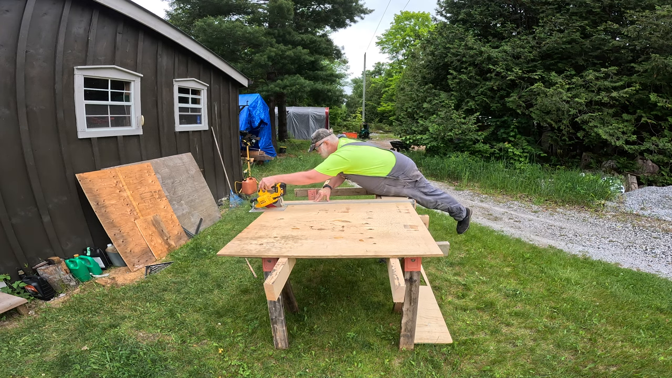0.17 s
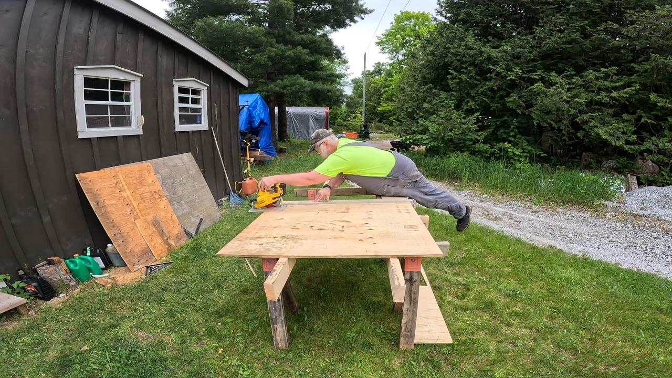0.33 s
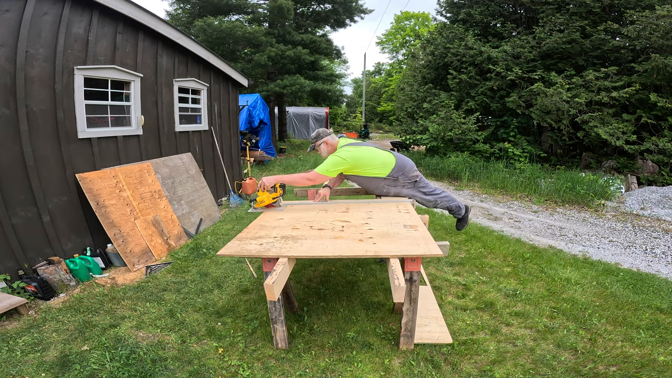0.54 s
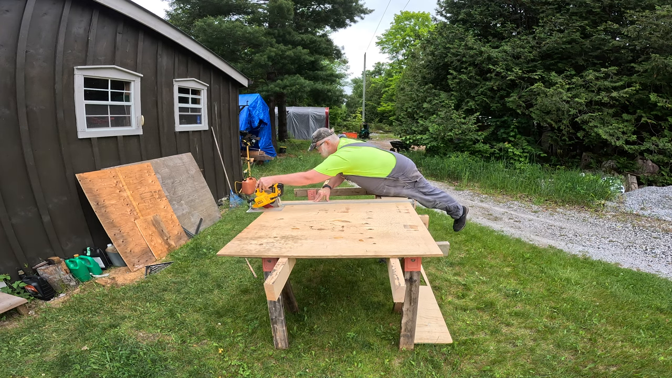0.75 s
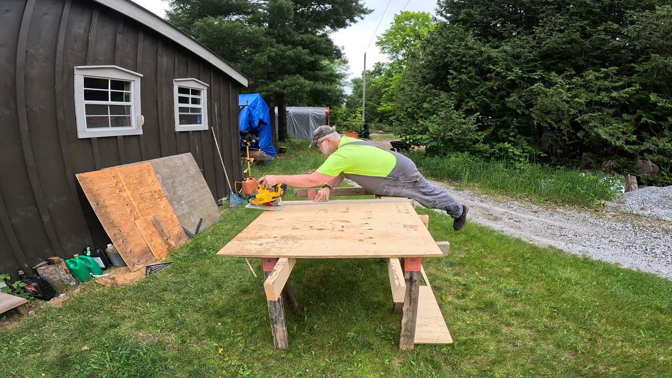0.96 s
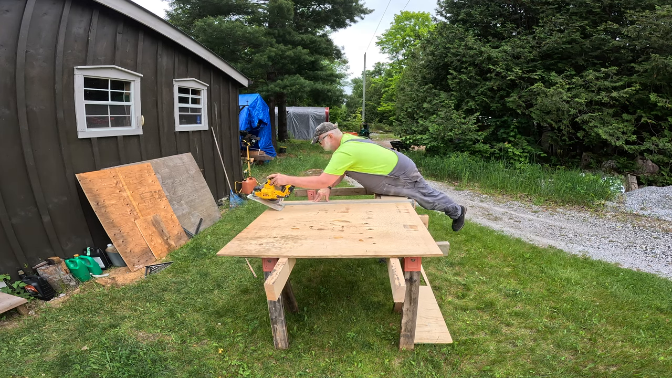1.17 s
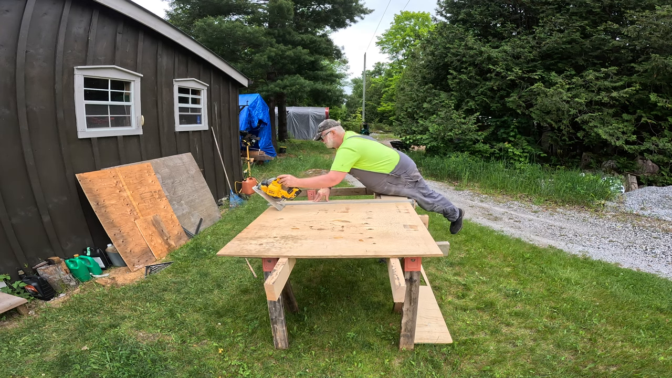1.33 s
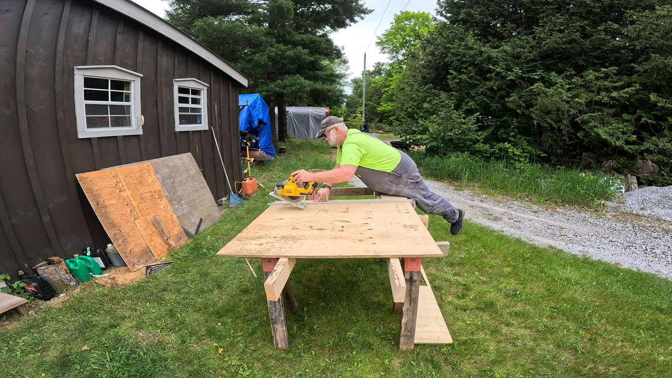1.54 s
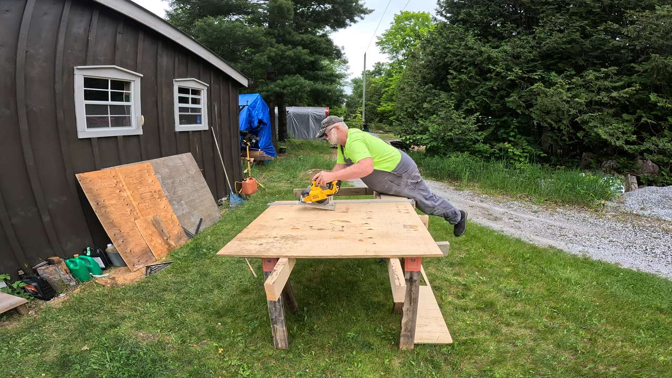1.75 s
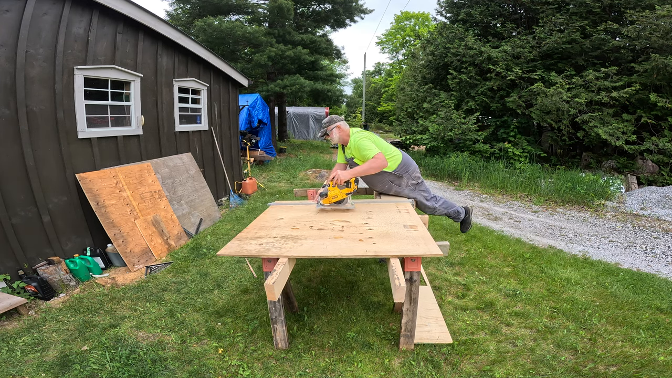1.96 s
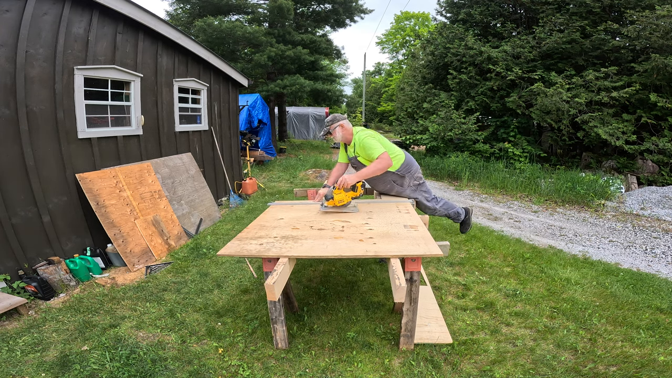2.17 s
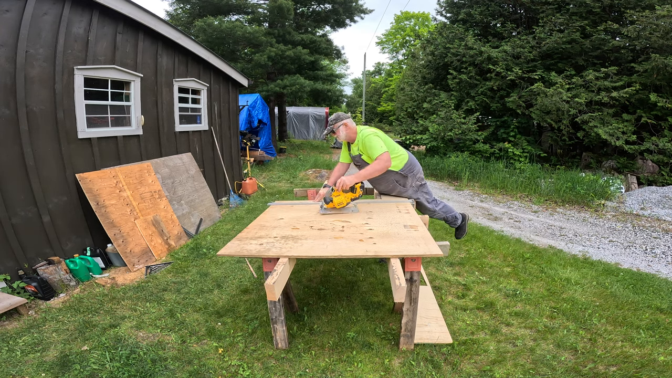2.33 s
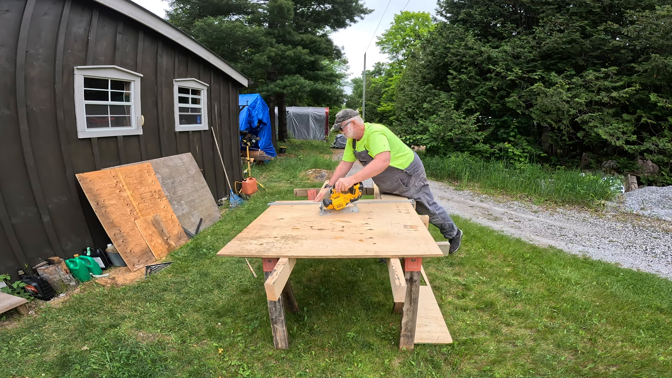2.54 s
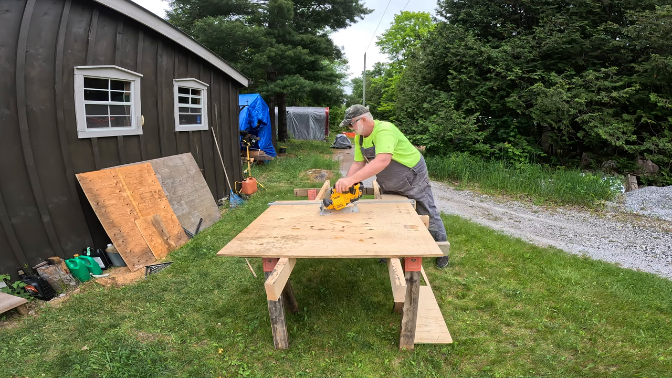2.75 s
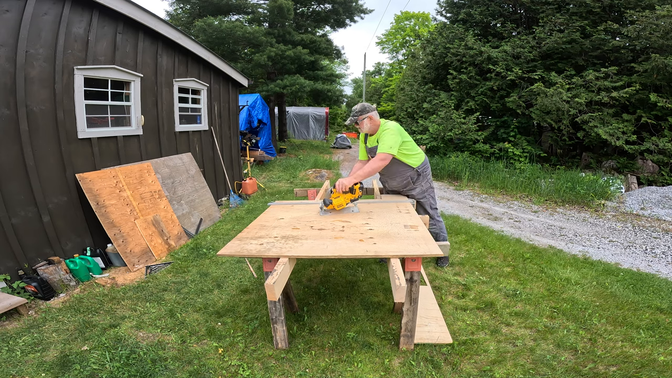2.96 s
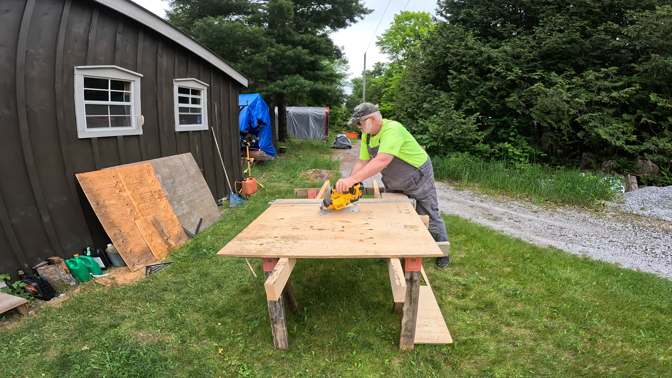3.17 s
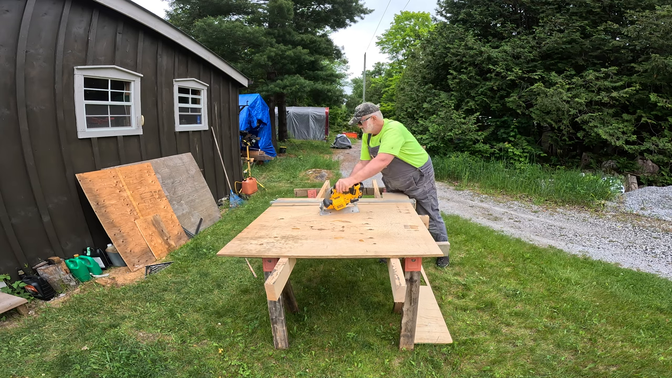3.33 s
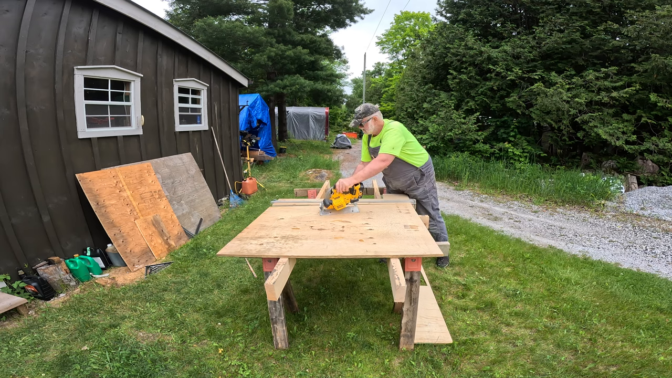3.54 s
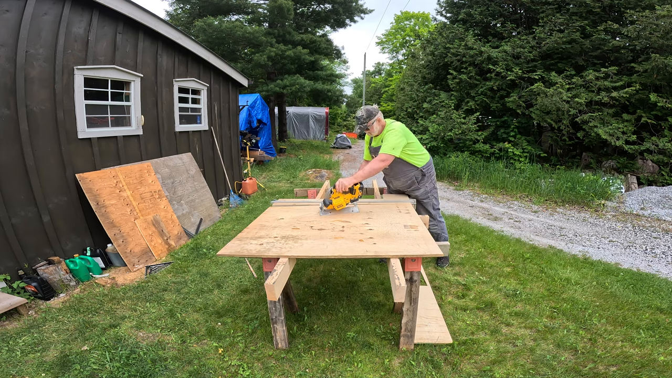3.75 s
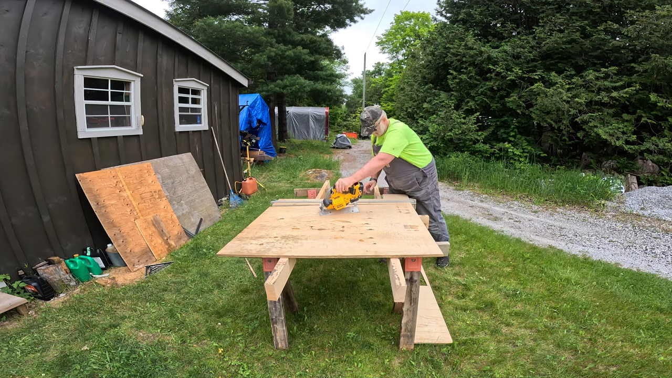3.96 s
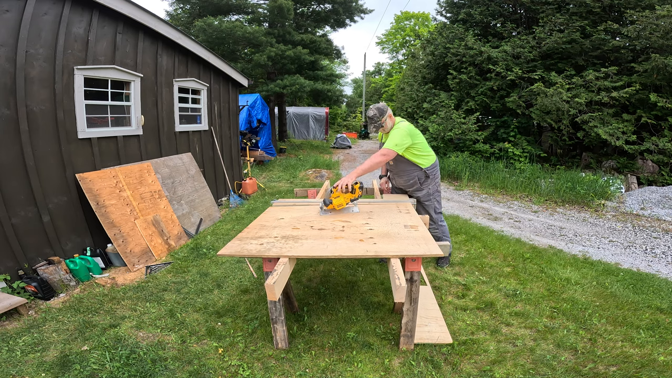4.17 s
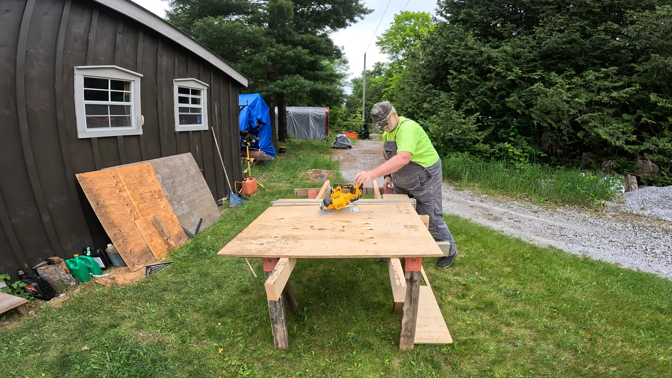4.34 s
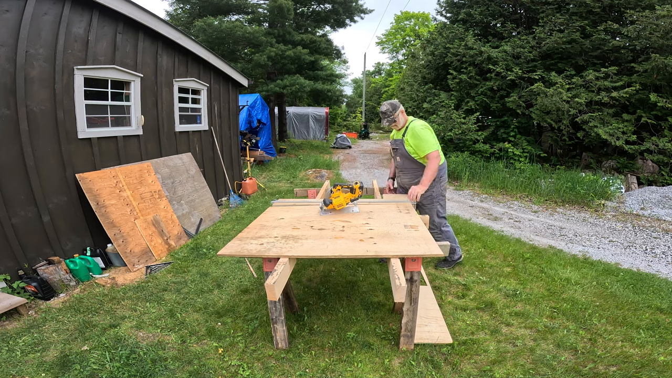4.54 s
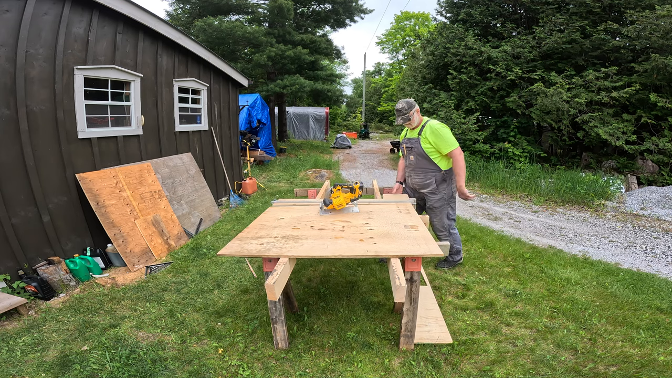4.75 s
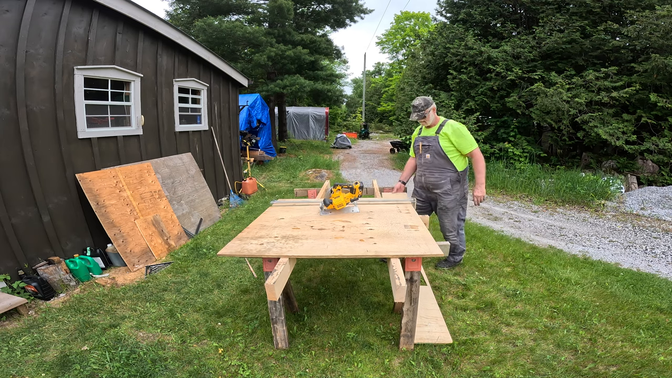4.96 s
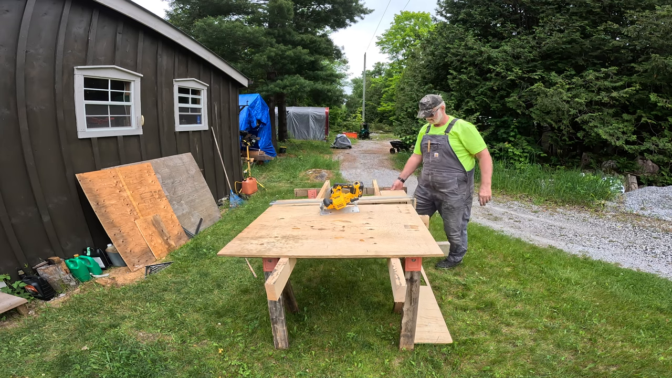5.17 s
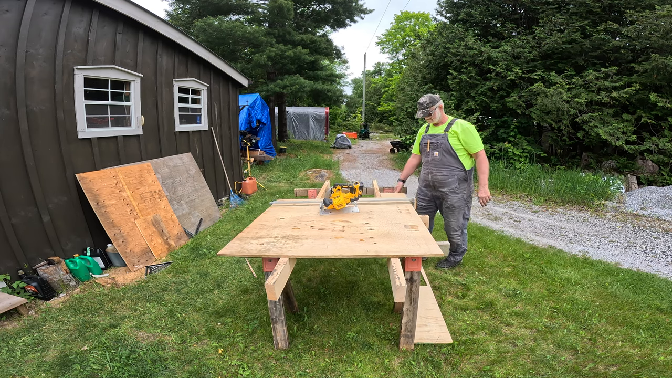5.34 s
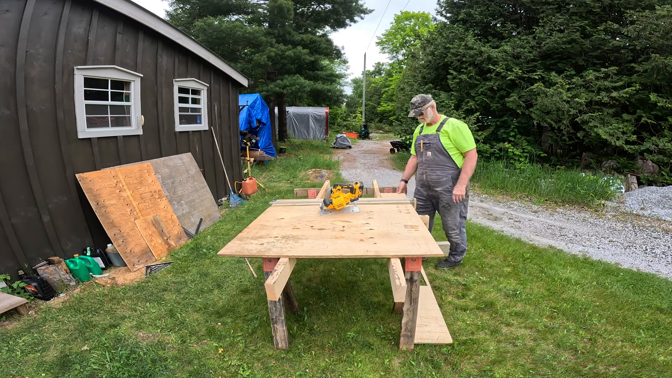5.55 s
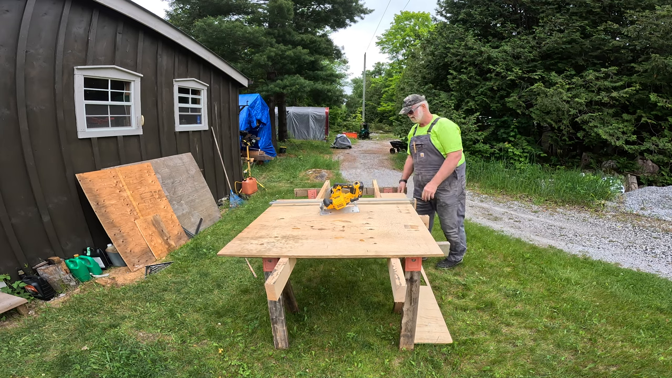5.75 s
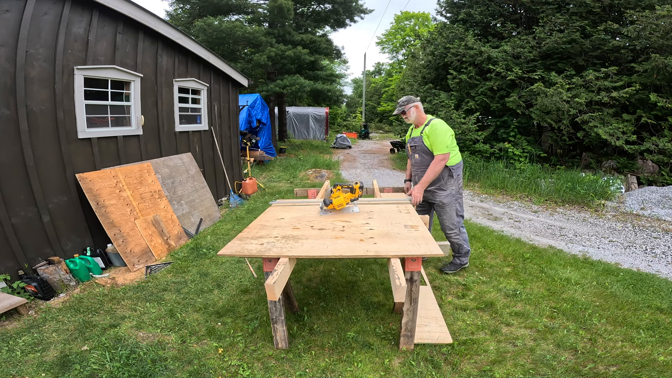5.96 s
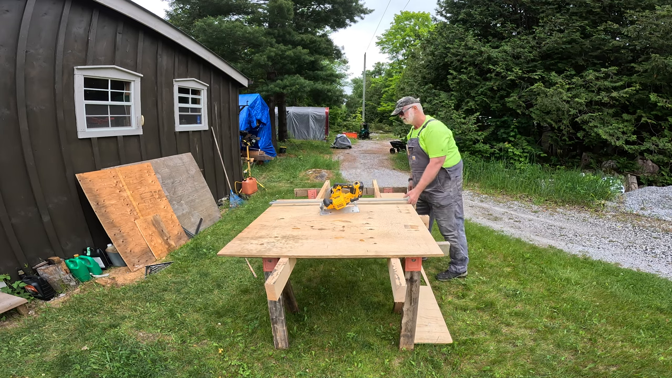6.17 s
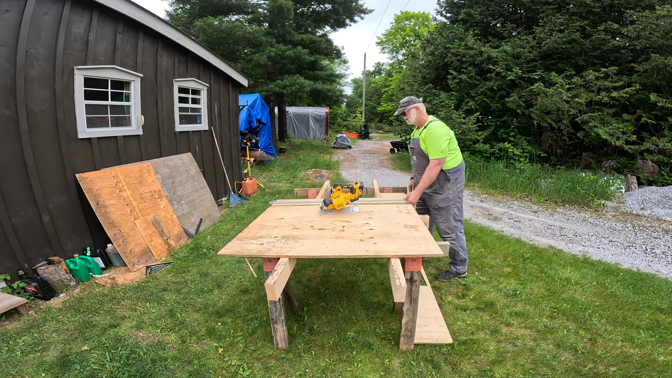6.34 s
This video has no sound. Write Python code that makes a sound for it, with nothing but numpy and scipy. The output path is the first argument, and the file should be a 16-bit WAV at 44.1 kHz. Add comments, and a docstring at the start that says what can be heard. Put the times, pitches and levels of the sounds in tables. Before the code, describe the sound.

A circular saw's bright whine brakes quickly to silence outdoors, then scrapes, wooden knocks and metal clacks follow over soft leaf hiss and birds.

```python
"""Outdoors by a shed and trees, a circular saw runs out of a cut in a wooden sheet on trestles and is braked.
Noise bands make its rush, resonances the singing blade, and sines at multiples of the armature speed the whine.
The saw is pulled back across the sheet and set down, and a loose board is knocked about: gritty contact forces
drive the sheet's decaying modes, and short resonant bursts make metal clacks. Banded noise gives soft wind and
hissing leaves; trembling or gliding sines whistle as birds, and delays and diffuse tails echo the place."""
import sys
import numpy as np
from scipy import signal
from scipy.io import wavfile

SR = 44100
rng = np.random.default_rng(int(sys.argv[2]) if len(sys.argv) > 2 else 0)


def wav_out(sig):
    """Save sig, one row per channel (or a flat mono array), as 16-bit PCM at SR to the path in sys.argv[1]."""
    wavfile.write(sys.argv[1], SR, np.round(np.clip(np.atleast_2d(sig).T, -1, 1) * 32767).astype(np.int16))


N = 282240
TIME = np.arange(N) / SR

# colour of the wind before scaling: (frequency [Hz], density [dB per Hz])
WIND_COLOUR = [(12, -34), (20, -5), (32, 1.5), (49, 2.5), (85, -9), (113, -17), (201, -11), (400, -47.5),
               (520, -67.5), (880, -120)]
# background level of the low wind rumble before its trim, with dips: (time [s], level [dB])
WIND_LEVEL = [(.9, -63), (1.4, -49), (2.2, -54), (5, -53), (5.7, -59)]
# colour of the leaves before scaling: (frequency [Hz], density [dB per Hz])
LEAF_COLOUR = [(180, -43), (300, 2.5), (409, -6), (567, -2.5), (679, -4), (941, -2), (1070, 4), (1200, 1.5),
               (1900, -1.5), (3900, -6.5), (4230, -9), (9420, -18.5), (14900, -79)]
# background level of the leaf hiss before its trim, with dips: (time [s], level [dB])
LEAF_LEVEL = [(0, -60.5), (2.55, -62.5), (2.8, -56), (3.8, -62), (5.2, -61.5), (5.68, -66), (6.4, -65)]
# how alike wind and leaves are at left and right: (frequency [Hz], likeness [0 to 1])
GARDEN_LIKENESS = [(100, 0.98), (500, 0.82), (2000, 0.76), (3500, 0.31), (5500, 1), (9000, 0.89),
                   (12500, 0.28)]

# a songbird's long swooping whistle, level before the trims: (time [s], pitch [Hz], level [dB])
SWOOP_CURVE = [(3.75, 4070, -49), (3.83, 4770, -49.5), (3.885, 5000, -53), (3.925, 4470, -51.5),
               (3.965, 3470, -58.5), (4.13, 3770, -56.5)]
SWOOP_WAVER = 0.028   # spread of the pitch, as a share
# short notes of birds near and far, level before the trims: (start [s], end [s], first pitch [Hz],
# last pitch [Hz], level [dB], waver [share of pitch], octave against the note [dB])
BIRD_NOTES = [(3.882, 3.998, 4880, 4880, -56, 0.015, -32), (4.005, 4.142, 5030, 6100, -56.5, 0.11, -32),
              (4.181, 4.234, 3585, 3650, -50, .008, -7), (5.95, 6.03, 4244, 4160, -60, 0.0092, -19.5),
              (6.037, 6.167, 4290, 4190, -70, .008, -12), (6.22, 6.347, 1183, 1130, -57.5, 0.074, -20)]

# echoes off the ground, the shed wall and the trees: (delay [s], level [dB], left over right [dB])
YARD_ECHOES = [(.0045, -28.5, 3), (0.013, -17.5, 0.5), (0.03, -22, -2.5), (0.059, -23, 4),
               (0.111, -34.5, -6)]

# the sheet's modes, density before each answer is scaled: (frequency [Hz], density [dB per Hz], t60 [s])
SHEET_MODES = [(55.24, -11.5, 0.61), (90, -2, 0.18), (160, 5, 0.3), (313, 2.5, 0.11), (350, -10.5, 0.3),
               (554, -3, 0.04), (780, -6.5, 0.1), (1070, -6, 0.091), (1810, -11.5, 0.064),
               (2970, -18.5, 0.071), (4740, -30, 0.052), (9470, -35, 0.079), (11500, -52, 0.025),
               (14970, -68, .03)]
# where the weight and hardness of a contact shade the sheet's colour: thud, two of boom, two neutral, two of crack
SHADE_HZ = (88.5, 149, 274, 553, 1290, 4400, 11900)
# blows of saw and board on the sheet: (time [s], level over 30 ms [dB], contact length [s],
# trestle thud [dB], boom [dB], crack [dB], the struck spot's own ring [Hz])
SHEET_KNOCKS = [(1.27, -30, 0.011, -26, -12.5, -3, 1520), (1.409, -35.5, 0.013, -18, -15.5, -1.5, 1450),
                (1.498, -48.5, 0.012, -13, -9, 9, 1440), (1.534, -46, 0.0059, -16, -35, -13, 700),
                (1.841, -37, 0.0023, 16.5, -5, -8, 700), (2.179, -44.5, 0.0071, 5, 2, 13, 670),
                (2.195, -24.5, 0.0059, -10, -1.5, -3.5, 640), (2.207, -24, .002, 1, 13.5, 5.5, 630),
                (2.286, -37.5, 0.0054, 18.5, 8, -1, 500), (2.536, -38.5, .011, 19, 12, 8.5, 587),
                (3.488, -36.5, 0.0013, -1, 0.5, 5.5, 4400), (3.665, -20, .006, 13, -1, -2, 1470),
                (3.715, -33, 0.012, 24, 8, 5, 614), (5.119, -23, 0.011, -2.5, -6.5, -5, 618),
                (5.283, -33.5, 0.0039, 2, 16, 6, 505), (5.328, -30, 0.0024, 9, 18, -6.5, 500),
                (5.373, -32, 0.0085, 4, 12, -6, 650), (5.398, -21, 0.0026, 23.5, 8.5, 5, 487),
                (5.405, -23.5, 0.0052, -18, -18, -10, 604), (5.447, -22, 0.0035, 6, -5.5, -19.5, 540),
                (5.571, -42, 0.011, 29, 13, -18, 545)]
# the bounce: gap after a blow of BOUNCE_AT_DB, and the extra dB that double the gap
BOUNCE_S, BOUNCE_AT_DB, BOUNCE_DOUBLING_DB = 0.024, -27, 34
BOUNCE_LOSS_DB, BOUNCE_BOOM_DB = 8.5, 9
# light, bright taps of the saw's shoe and the board's edge:
# (time [s], level over 30 ms [dB], the struck spot's own ring [Hz])
LIGHT_TAPS = [(.659, -45.5, 980), (.906, -50, 1240), (1.011, -54, 4960), (1.217, -65, 1370),
              (1.675, -47.5, 1260), (2.15, -51.5, 1730), (2.244, -43, 6950), (2.444, -61, 2580),
              (2.697, -51, 3720), (4.123, -56.5, 4150), (4.245, -53.5, 1690), (5.185, -46.5, 940),
              (5.22, -50, 900)]
TAP_CONTACT_S, TAP_THUD_DB, TAP_BOOM_DB = 0.0038, -5, -6.5
# the saw's shoe and the board sliding: (start [s], end [s], level over the stroke [dB], boom [dB])
SLIDE_STROKES = [(1.03, 1.056, -50.5, -9), (1.162, 1.203, -45.5, 1.5), (1.762, 1.804, -40.5, -6),
                 (1.807, 1.845, -37.5, -11), (1.888, 1.946, -37.5, -3), (1.926, 1.996, -31.5, 6),
                 (1.976, 2.136, -38, 8), (2.706, 2.79, -50.5, -1), (2.863, 2.933, -45.5, 1.5),
                 (3.619, 3.664, -41.5, -13), (5.188, 5.43, -51.5, 5), (5.773, 5.86, -69.5, -3)]
SLIDE_SKEW, SLIDE_ROUNDNESS = 0.65, 0.67   # a stroke swells quickly and dies more slowly
# the lighter a tap or a slide, the more of it is crack: crack at LIGHT_DB, and its rise per dB less
LIGHT_DB, TAP_CRACK_DB, SLIDE_CRACK_DB, CRACK_PER_DB = -48.5, 13, 9, 0.32
# the saw's guard and shoe clacking: (time [s], peak level [dB], pitch [Hz])
METAL_CLACKS = [(2.249, -36, 7300), (3.4887, -25, 4200), (3.671, -33.5, 4210), (3.690, -23.5, 4180),
                (3.689, -28.5, 5750)]

# partials of the whine, before the whine's own level: (multiple of the armature speed [x], level [dB])
WHINE_PARTIALS = [(1, -16.5), (2, -12.5), (3, -5.5), (4, -6.5), (5, -11), (7, -17.5), (8, 1.5), (9, -3.5),
                  (12, -11), (15, -5)]
WHINE_DB, WHINE_SPEED_POWER = -34.5, 0.67   # at full speed; the power of the speed that its strength follows
# the armature runs at full speed until the brake takes hold, then slows evenly
FULL_TURNS_PER_S, BRAKE_AT_S, BRAKE_GRIP_S, BRAKE_TURNS_PER_S2 = 364, 0.27, 0.025, 860
HOUSING_HZ, HOUSING_WIDTH_HZ, HOUSING_DB = 2150, 240, 12.5   # partials swell as they fall through this
MUFFLE_FROM_HZ, MUFFLE_DB_PER_OCTAVE = 3300, 14.5   # the housing holds back the highest partials
SAW_STOP_S, SAW_FADE_S = 0.602, 0.056   # when the fade starts; the time it takes to lose 20 dB

# loudness of the cut before the trims: (time [s], rush level [dB], treble level [dB])
CUT_LEVEL = [(0.0, -17.5, -26.5), (0.082, -19.5, -30), (0.19, -20, -28.5), (0.21, -24.5, -33.5),
             (0.296, -20.5, -30.5), (0.392, -22.5, -35), (0.458, -22, -32), (0.474, -23, -33.5),
             (0.566, -31, -53), (0.582, -32.5, -43), (0.604, -39.5, -72), (0.62, -49, -68.5)]
# colour of the saw's rush before scaling: (frequency [Hz], density [dB per Hz])
RUSH_COLOUR = [(60, -35.5), (150, -34.5), (270, -8.5), (420, -12.5), (800, 4.5), (1500, 1.5), (2200, 7.5),
               (2900, 1), (3500, 1.5), (5800, -8.5), (6800, -9.5), (9200, -4), (11000, -22.5),
               (15000, -43.5)]
# how alike the rush is at left and right: (frequency [Hz], likeness [0 to 1])
RUSH_LIKENESS = [(200, 0.85), (730, 0.92), (1400, 1), (3200, .93), (5300, .997), (8800, 0.98),
                 (14400, 0.59)]
# resonances of the steel blade, level before loudness: (frequency [Hz], width [Hz], level [dB])
BLADE_RINGS = [(300, 40, -28.5), (558.3, 16, -21), (843.5, 6.6, -18), (983, 7.2, -10), (1052, 34, -12),
               (1150, 15, -19), (1385, 6, -15), (2506, 9.5, -10.5), (2680, 30, -16), (2730, 45, -7.5),
               (2900, 20, -18), (2878, 45, -9), (2950, 26, -15.5), (3730, 18, -18.5), (4100, 16, -21),
               (4540, 20, -24), (5770, 81, -20.5), (8930, 210, -23)]

# the very top is louder on the left, and all sound ends at a steep cutoff
TOP_LEAN_HZ, TOP_LEAN_WIDTH_HZ, TOP_LEAN_DB, CUTOFF_HZ = 13500, 4300, 4, 15100


def from_db(db):
    """Decibels to gain."""
    return 10 ** (np.asarray(db) / 20)


def rms_one(x):
    """Scale to rms 1."""
    return x / np.sqrt(np.mean(x ** 2) + 1e-20)


def in_time(rows):
    """Each column of a curve at every sample."""
    s, *columns = np.transpose(rows)
    return [np.interp(TIME, s, c) for c in columns]


def at_hz(rows, hz):
    """Each column of a spectrum at the given frequencies."""
    points, *columns = np.transpose(rows)
    return [np.interp(np.log(hz), np.log(points), c) for c in columns]


def panned(x, pan_db):
    """Stereo, with the left side louder by pan_db."""
    return x * from_db(np.array([[0.5], [-0.5]]) * pan_db)


def add(out, s, x):
    """Mix x in at time s."""
    start = int(s * SR)
    out[start:start + len(x)] += x[:N - start]


def drift(rate):
    """Random wander through 2000 points of spread 1, `rate` points a second; the last one then holds."""
    steps = rng.standard_normal(2000)
    return np.interp(TIME * rate, np.arange(len(steps)), steps)


def arch(progress):
    """Rises from 0 to 1 and falls back as progress goes from 0 to 1."""
    return np.abs(np.sin(np.pi * np.clip(progress, 0, 1)))


def resonance(x, hz, width_hz):
    """A two-pole resonance with gain 1 on top."""
    r = np.exp(-np.pi * width_hz / SR)
    feed = np.array([1, 0, -1]) * (1 - r * r) / 2
    return signal.lfilter(feed, [1, -2 * r * np.cos(2 * np.pi * hz / SR), r * r], x)


def noise_bands(spectrum, likeness, patchy_db, flicker_rate):
    """Centres and stereo bands of coloured noise, each flickering by itself; rms 1 together."""
    edges = 20 * 2 ** np.arange(0, 9.7, 0.4)
    centres, bands = [], []
    for low, high in zip(edges, edges[1:]):
        hz = np.sqrt(low * high)
        if spectrum[0][0] / 2 < hz < spectrum[-1][0] * 2:
            band = signal.butter(2, [low, high], "band", fs=SR, output="sos")
            mid, side = signal.sosfilt(band, rng.standard_normal((2, N)))
            alike = np.clip(at_hz(likeness, hz)[0], 0, 1)
            gain = from_db(at_hz(spectrum, hz)[0] + patchy_db * drift(flicker_rate))
            stereo = np.sqrt(1 + alike) * mid + np.sqrt(1 - alike) * side * [[1], [-1]]
            centres.append(hz)
            bands.append(gain * stereo)
    bands = np.array(bands)
    return np.array(centres), bands / bands.sum(0).std()


def garden(wind_trim_db=3, leaves_trim_db=1):
    """Lumpy, deep wind noise under the finer, quicker flicker of hissing leaves."""
    wind = noise_bands(WIND_COLOUR, GARDEN_LIKENESS, patchy_db=5.0, flicker_rate=4.9)[1].sum(0)
    leaves = noise_bands(LEAF_COLOUR, GARDEN_LIKENESS, patchy_db=2.87, flicker_rate=19)[1].sum(0)
    wind_gain = from_db(in_time(WIND_LEVEL)[0] + wind_trim_db)
    leaves_gain = from_db(in_time(LEAF_LEVEL)[0] + leaves_trim_db)
    return wind_gain * wind + leaves_gain * leaves


def scattered(x, t60):
    """A diffuse tail of decaying noise, different at each side."""
    tails = rng.standard_normal((2, SR // 2)) * from_db(-60 * TIME[:SR // 2] / t60)
    return np.array([signal.fftconvolve(x, tail / np.linalg.norm(tail))[:N] for tail in tails])


def whistle_phase(hz, waver):
    """Phase of a whistle whose pitch trembles quickly; after about 4.4 s only a steady offset is left."""
    return 2 * np.pi * np.cumsum(hz * (1 + waver * drift(450))) / SR


def birds(direct_trim_db=-4, trees_trim_db=-5, trees_t60=0.33):
    """Thin sine whistles, the short notes with an octave above, scattered by the trees."""
    hz, db = in_time(SWOOP_CURVE)
    sounding = (TIME > SWOOP_CURVE[0][0]) * (TIME < SWOOP_CURVE[-1][0])
    song = sounding * from_db(db) * np.sin(whistle_phase(hz, SWOOP_WAVER))
    for start, end, first_hz, last_hz, db, waver, octave_db in BIRD_NOTES:
        progress = np.clip((TIME - start) / (end - start), 0, 1)
        phase = whistle_phase(first_hz + (last_hz - first_hz) * progress, waver)
        note = np.sin(phase) + from_db(octave_db) * np.sin(2 * phase)
        song += from_db(db) * arch(progress) * note
    return from_db(direct_trim_db) * song + from_db(trees_trim_db) * scattered(song, trees_t60)


def yard(x, dull_hz=3500):
    """A few delayed copies, dulled by a low-pass and panned apart."""
    dull = signal.sosfilt(signal.butter(1, dull_hz, fs=SR, output="sos"), x)
    echoes = 0
    for delay, db, pan_db in YARD_ECHOES:
        late = np.interp(TIME - delay, TIME, dull, left=0)
        echoes = echoes + from_db(db) * panned(late, pan_db)
    return echoes


def near_scatter(x, level_db=-7.5, hz=2000, width_hz=4200, t60=0.045):
    """Trestles, boards and the shed wall close by scatter the middle range of the wood and clacks."""
    return from_db(level_db) * scattered(resonance(x, hz, width_hz), t60)


def microphones(x, pan_db, shade_hz=300):
    """Two close ports: the bass is alike in both, only higher sound leans to one side."""
    upper = signal.sosfilt(signal.butter(1, shade_hz, "high", fs=SR, output="sos"), x)
    return x - upper + panned(upper, pan_db)


def sheet_modes(count=700):
    """The sheet's crowded, well damped modes: their pitches and their decaying sines."""
    root_hz = np.linspace(np.sqrt(SHEET_MODES[0][0]), np.sqrt(SHEET_MODES[-1][0]), count)
    hz = (root_hz + rng.uniform(-0.12, 0.086, count)) ** 2
    level_db, t60 = at_hz(SHEET_MODES, hz)
    t = TIME[:SR // 4]
    height = from_db(level_db) * np.sqrt(np.sqrt(hz) / t60)   # the table gives energy per Hz
    decay = np.exp(-np.log(1000) * t / t60[:, None])
    return hz, height[:, None] * decay * np.sin(2 * np.pi * hz[:, None] * t)


def sheet_answer(sheet, force, thud_db, boom_db, crack_db, spot_hz, spot_db,
                 spot_octaves=0.38, uneven_db=2, top_db=-7):
    """Each contact point weights the modes anew and favours some; the answer has unit energy."""
    hz, modes = sheet
    shade_db = [thud_db, boom_db, boom_db, 0, 0, crack_db, crack_db + top_db]
    db, = at_hz(list(zip(SHADE_HZ, shade_db)), hz)
    db += spot_db * np.exp(-(np.log2(hz / spot_hz) / spot_octaves) ** 2)
    db += uneven_db * rng.standard_normal(len(hz))
    impulse = (rng.choice([-1, 1], len(hz)) * from_db(db)) @ modes
    ring = signal.fftconvolve(impulse, force)
    return ring / np.linalg.norm(ring)


def grit(share, spread_db):
    """A quarter second of tiny contacts of uneven size."""
    size = SR // 4
    touching = rng.random(size) < share
    strength = from_db(spread_db * np.minimum(rng.exponential(1, size), 4))
    return touching * rng.choice([-1, 1], size) * strength


def light_crack(crack_db, db):
    """Crack in dB for a contact of level db: lighter contacts crack more."""
    return crack_db + CRACK_PER_DB * (LIGHT_DB - db)


def slides(sheet, rasp_hz=5000, rasp_db=10, thud_db=-3, judder_db=2.0):
    """Wood grain catches and slips under a sliding face; each stroke swells and fades."""
    out = np.zeros(N)
    for start, end, db, boom_db in SLIDE_STROKES:
        force = grit(share=0.08, spread_db=6.0)
        length = max(end - start, 0.01)
        force *= arch((TIME[:len(force)] / length) ** SLIDE_SKEW) ** SLIDE_ROUNDNESS
        force *= from_db(judder_db * drift(65.3)[:len(force)])   # the hand's pressure is uneven
        crack_db = light_crack(SLIDE_CRACK_DB, db)
        ring = sheet_answer(sheet, force, boom_db + thud_db, boom_db, crack_db, rasp_hz, rasp_db)
        add(out, start, from_db(db) * np.sqrt(length * SR) * ring)
    return out


def blow(sheet, db, contact_s, thud_db, boom_db, crack_db, spot_hz, first_touch=1.75, spot_db=6):
    """A first touch, then a brief rattle as the two faces settle."""
    level_span_s = 0.03
    force = grit(share=0.013, spread_db=3)
    force[0] = first_touch
    force *= np.exp(-(TIME[:len(force)] / (2 * contact_s)) ** 2)
    ring = sheet_answer(sheet, force, thud_db, boom_db, crack_db, spot_hz, spot_db)
    return from_db(db) * np.sqrt(level_span_s * SR) * ring


def taps(sheet):
    """Short, hard touches that hardly move the sheet."""
    out = np.zeros(N)
    for s, db, spot_hz in LIGHT_TAPS:
        crack_db = light_crack(TAP_CRACK_DB, db)
        add(out, s, blow(sheet, db, TAP_CONTACT_S, TAP_THUD_DB, TAP_BOOM_DB, crack_db, spot_hz))
    return out


def knocks(sheet):
    """Each blow lands and bounces once, weaker and boomier; louder blows stay longer in the air."""
    out = np.zeros(N)
    for s, db, contact_s, thud_db, boom_db, crack_db, spot_hz in SHEET_KNOCKS:
        flight_s = BOUNCE_S * 2 ** ((db - BOUNCE_AT_DB) / BOUNCE_DOUBLING_DB)
        landing = blow(sheet, db, contact_s, thud_db, boom_db, crack_db, spot_hz)
        bounce = blow(sheet, db - BOUNCE_LOSS_DB, contact_s, thud_db + BOUNCE_BOOM_DB,
                      boom_db + BOUNCE_BOOM_DB, crack_db, spot_hz)
        add(out, s, landing)
        add(out, s + flight_s, bounce)
    return out


def clacks(width_hz=1300, t60=0.016):
    """Metal meets metal: a noise burst through two resonances at one pitch, gone at once."""
    out, t = np.zeros(N), TIME[:SR // 20]
    for s, db, hz in METAL_CLACKS:
        burst = rng.standard_normal(len(t)) * from_db(-60 * t / t60)
        ring = resonance(resonance(burst, hz, width_hz), hz, 2 * width_hz)
        add(out, s, from_db(db) * ring / np.abs(ring).max())
    return out


def armature_speed():
    """Turns per second: steady, then falling evenly once the brake has gripped."""
    braked_s = BRAKE_GRIP_S * np.logaddexp(0, (TIME - BRAKE_AT_S) / BRAKE_GRIP_S)
    return np.maximum(FULL_TURNS_PER_S - BRAKE_TURNS_PER_S2 * braked_s, 0)


def still_running():
    """Gain that dies away as the blade comes to rest."""
    return from_db(-20 * np.clip((TIME - SAW_STOP_S) / SAW_FADE_S, 0, 10))


def whine(jitter_hz=3, shimmer_db=3):
    """Partials of the armature speed fall together, weaker as it slows, swelling in the housing's resonance."""
    speed = armature_speed()
    phase = 2 * np.pi * np.cumsum(speed + jitter_hz * drift(300)) / SR
    tones = 0
    for order, db in WHINE_PARTIALS:
        hz = order * speed
        swell_db = HOUSING_DB / (1 + ((hz - HOUSING_HZ) / HOUSING_WIDTH_HZ) ** 2)
        muffle_db = MUFFLE_DB_PER_OCTAVE * np.log2(np.maximum(hz / MUFFLE_FROM_HZ, 1))
        gain = from_db(db + swell_db - muffle_db + shimmer_db * drift(90))
        tones += gain * np.sin(order * phase + rng.uniform(0, 2 * np.pi))
    strength = from_db(WHINE_DB) * (speed / FULL_TURNS_PER_S) ** WHINE_SPEED_POWER
    return np.sqrt(2) * tones * strength * still_running()


def rush(speed, level_db, bright_db, rush_trim_db=-5.5, treble_trim_db=-1, slow_low_db=13, low_hz=1000):
    """Teeth and cooling air stir banded noise whose low part gains weight as they slow."""
    hz, bands = noise_bands(RUSH_COLOUR, RUSH_LIKENESS, patchy_db=1.0, flicker_rate=32)
    treble = hz > 4500
    low = bands[hz < low_hz].sum(0)
    middle = bands[(hz >= low_hz) & ~treble].sum(0)
    deep = from_db(slow_low_db * (1 - speed / speed[0]) ** 2)
    body = (deep * low + middle) / np.sqrt(deep ** 2 * low.var() + middle.var())   # level stays even
    hiss = rms_one(bands[treble].sum(0))
    return from_db(level_db + rush_trim_db) * body + from_db(bright_db + treble_trim_db) * hiss


def blade_ring(speed, level_db, bright_db, rub, blade_trim_db=-3.5, upper_trim_db=-23,
               upper_width_hz=25, slow_ring_db=5):
    """Noisy strikes excite the steel blade's fixed resonances and a crowd of faint upper ones."""
    strikes = rng.standard_normal(SR) * rub[:SR]   # the blade is still within a second
    ring = sum(from_db(db) * rms_one(resonance(strikes, hz, width)) for hz, width, db in BLADE_RINGS)
    upper_hz = np.geomspace(3800, 9400, 56) * rng.uniform(0.98, 1.01, size=56)
    upper = sum(rms_one(resonance(strikes, hz, upper_width_hz)) for hz in upper_hz)
    blade = ring * from_db(level_db[:SR] + blade_trim_db)
    blade += upper * from_db(bright_db[:SR] + upper_trim_db)
    blade *= from_db(slow_ring_db * (1 - speed[:SR] / speed[0]))   # the ring outlasts the rush
    return np.pad(blade, (0, N - SR))


def saw(wobble=0.15, gearing=5, top_hz=11500):
    """Rush and blade ring pulse as the blade brushes the kerf once a turn; the highest treble is softened."""
    speed = armature_speed()
    level_db, bright_db = in_time(CUT_LEVEL)
    rub = 1 + wobble * np.sin(2 * np.pi * np.cumsum(speed / gearing) / SR)
    cut = rush(speed, level_db, bright_db) * rub + blade_ring(speed, level_db, bright_db, rub)
    soft_top = signal.butter(2, top_hz, fs=SR, output="sos")   # a gentle low-pass
    return signal.sosfilt(soft_top, cut * still_running())


def scene():
    """Saw and sheet stand just ahead, the garden lies all round."""
    background = garden() + birds()
    sheet = sheet_modes()
    wood = slides(sheet) + taps(sheet) + knocks(sheet) + clacks()
    tool = whine() + saw()
    near = tool + microphones(wood, pan_db=-1.5) + near_scatter(wood)
    return background + near + yard(wood + tool.mean(0))


def record(dry):
    """The very top is louder on the left and is cut steeply."""
    top = resonance(dry, TOP_LEAN_HZ, TOP_LEAN_WIDTH_HZ)
    heard = dry - top + panned(top, TOP_LEAN_DB)
    steep = signal.ellip(10, 0.1, 80, CUTOFF_HZ, fs=SR, output="sos")
    return signal.sosfilt(steep, heard)


dry = scene()
out = record(dry)
wav_out(out)
```